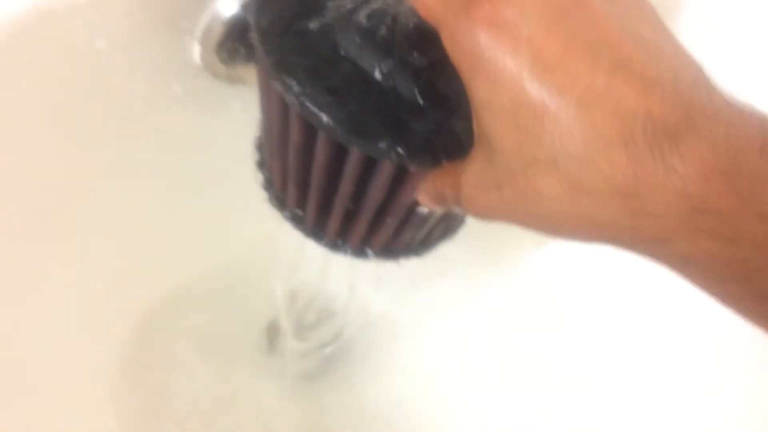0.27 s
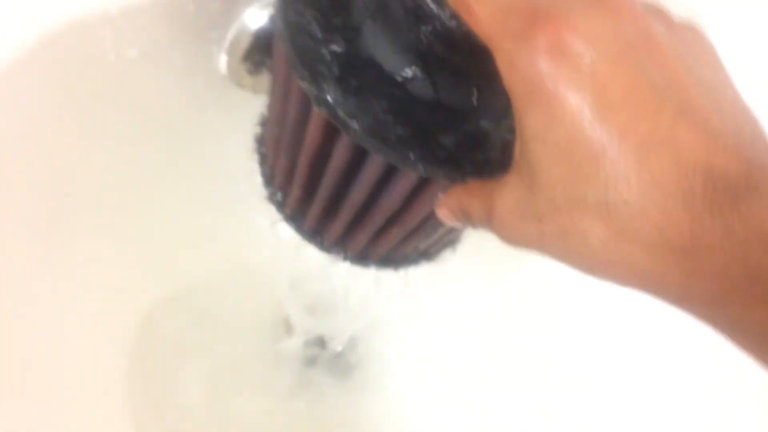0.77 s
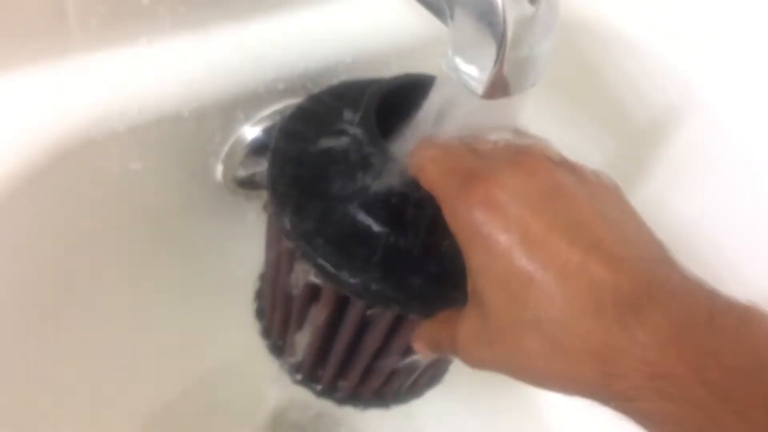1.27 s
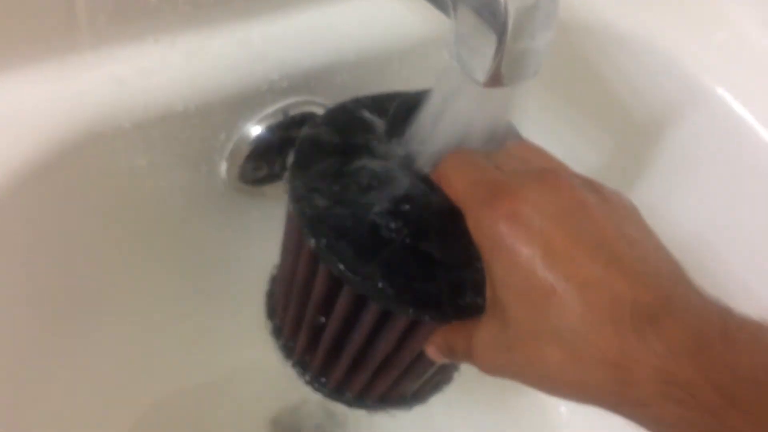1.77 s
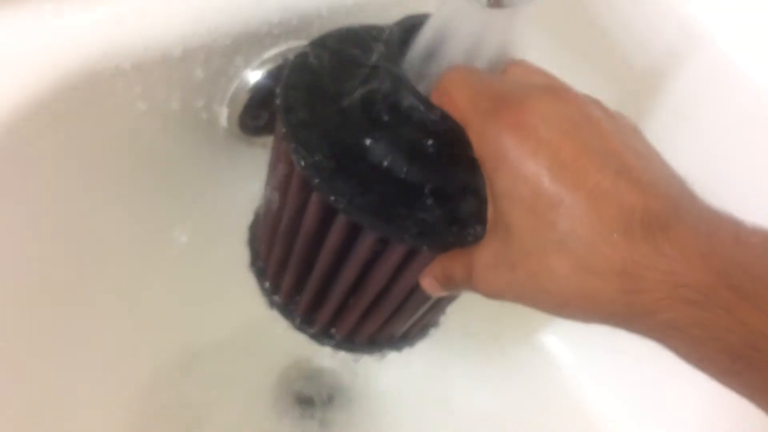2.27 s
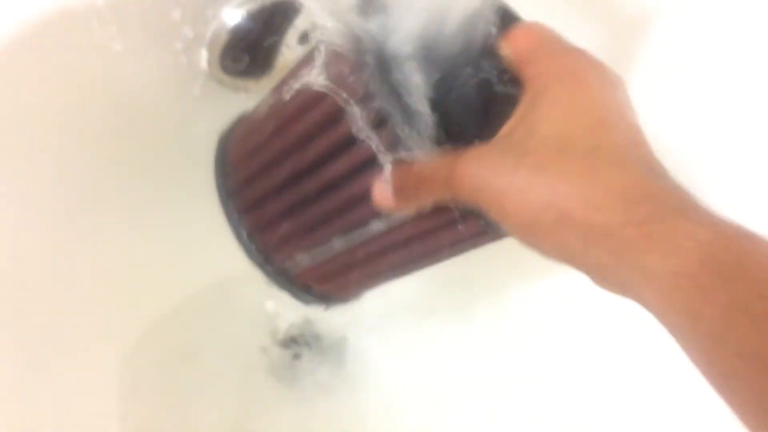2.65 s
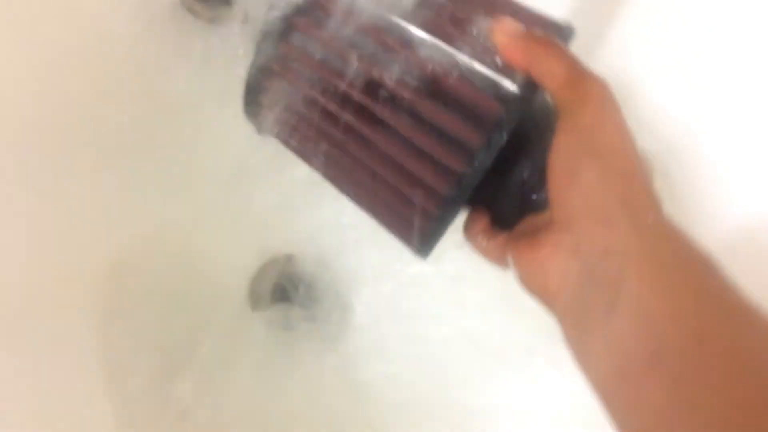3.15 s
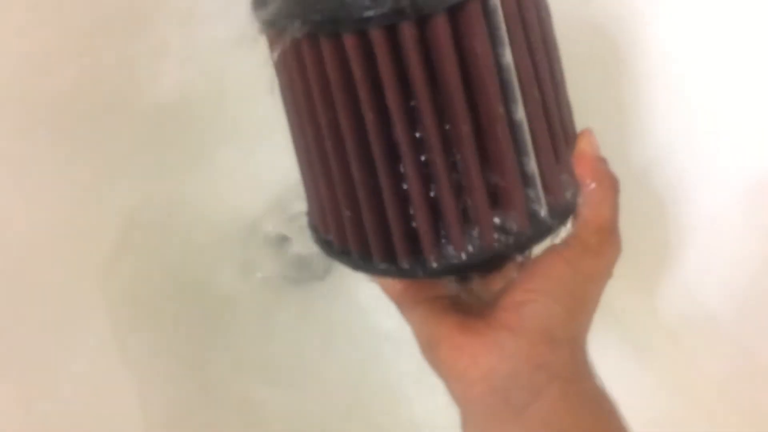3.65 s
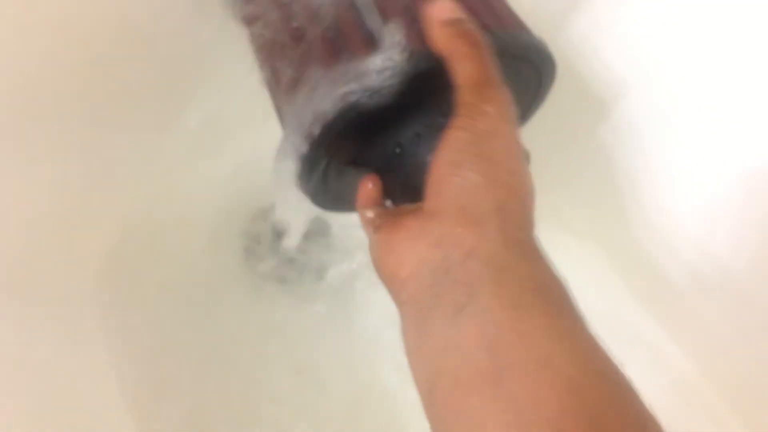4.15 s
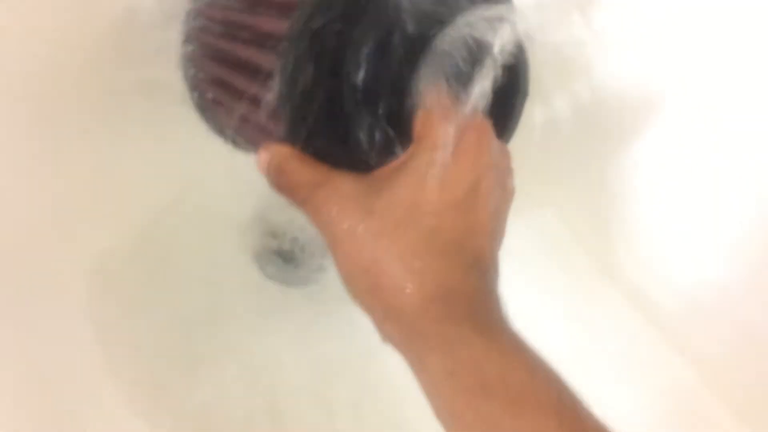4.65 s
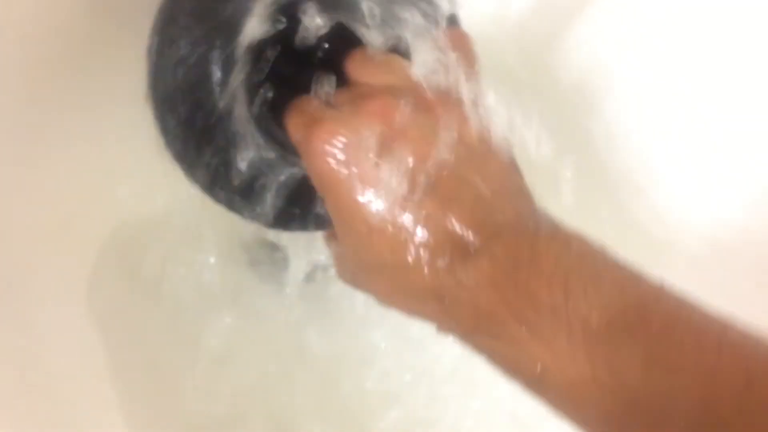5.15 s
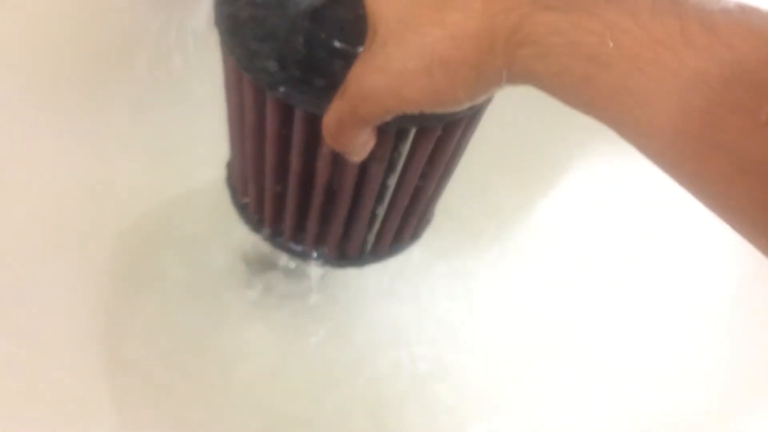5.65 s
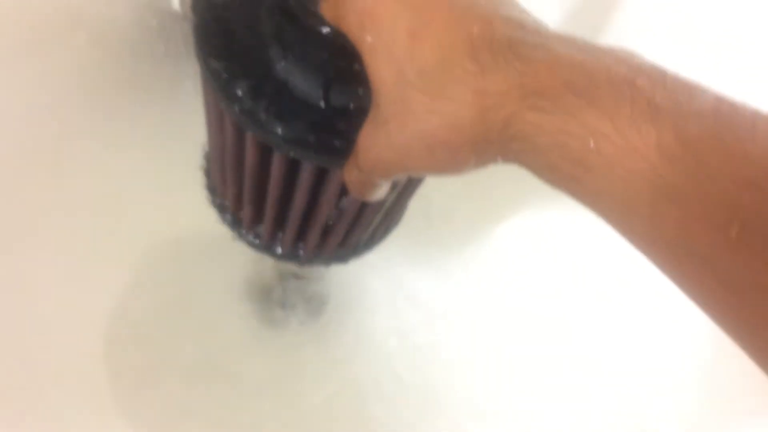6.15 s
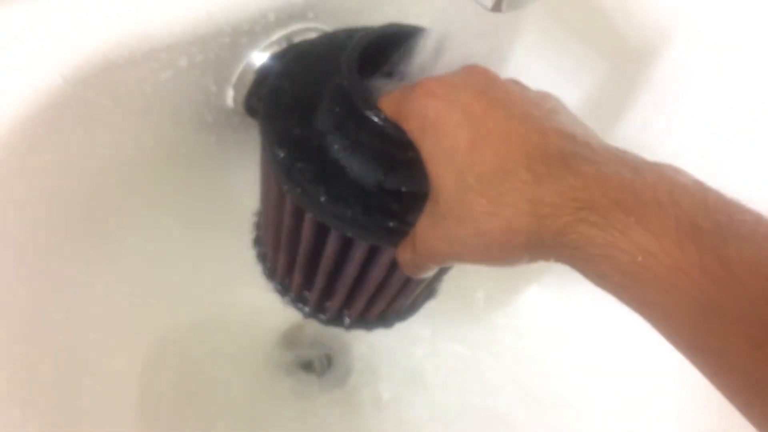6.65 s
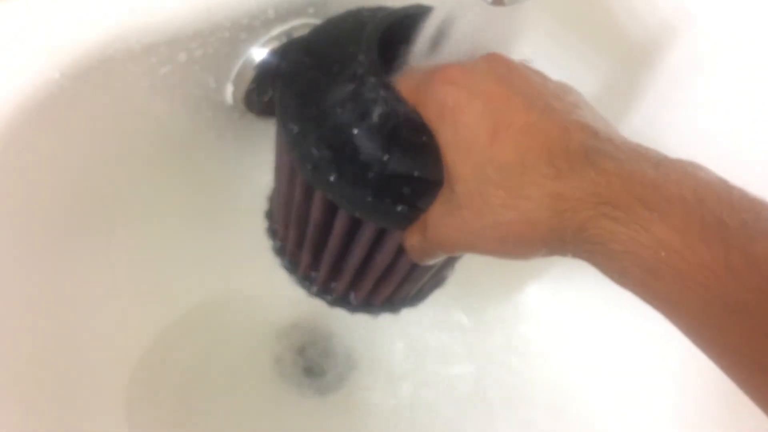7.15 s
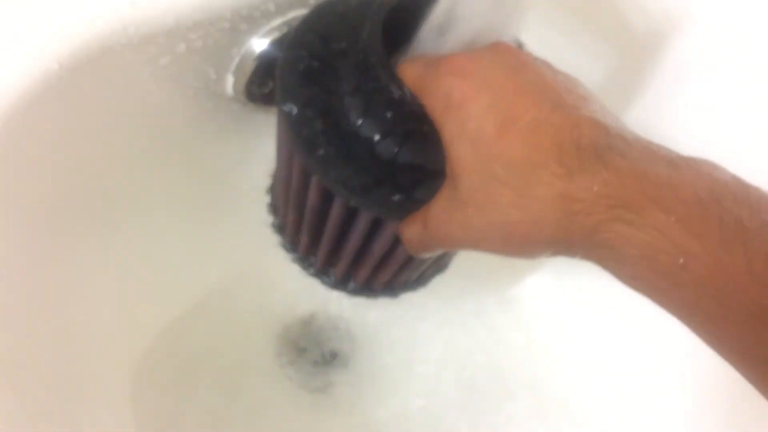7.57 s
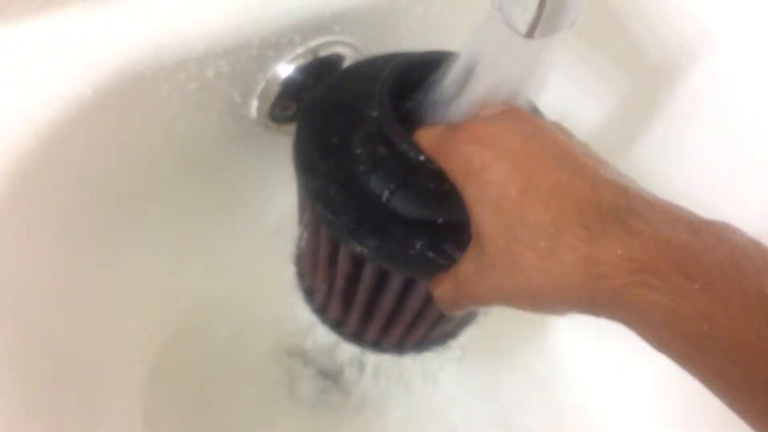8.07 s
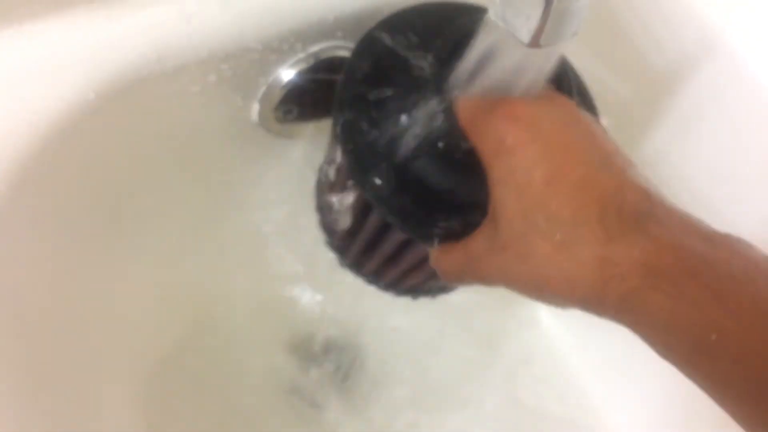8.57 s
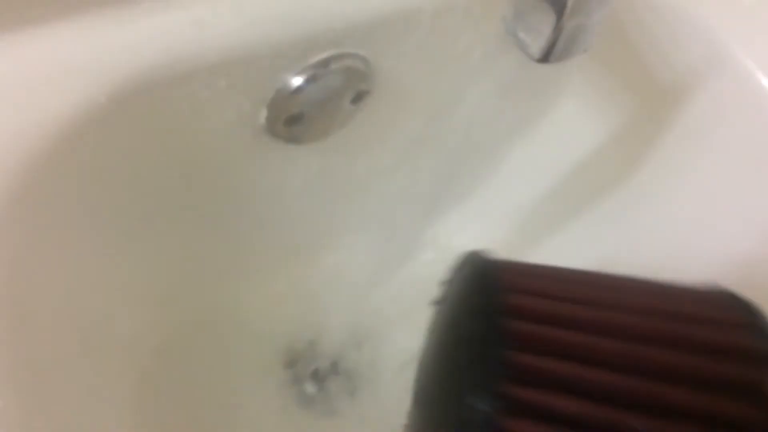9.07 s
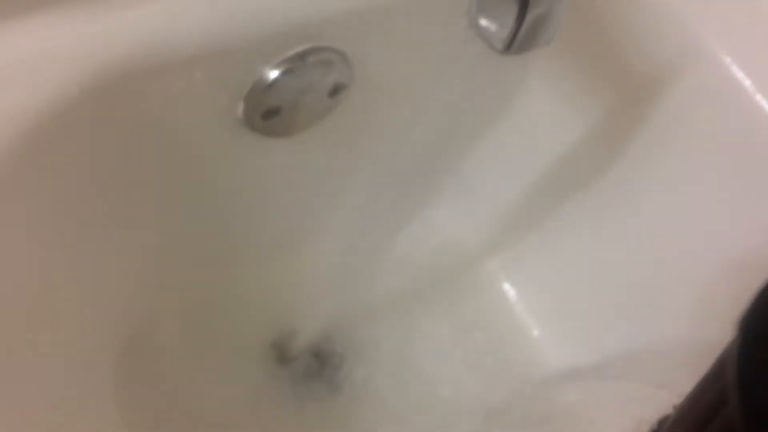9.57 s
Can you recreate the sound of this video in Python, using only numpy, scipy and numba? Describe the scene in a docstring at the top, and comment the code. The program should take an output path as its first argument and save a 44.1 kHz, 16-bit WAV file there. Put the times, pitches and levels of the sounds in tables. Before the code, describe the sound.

Steady hissing tap water sprays off a pleated filter and gurgles into a shallow tub, with a low hum beneath and a fuller splash at the close.

```python
"""In a bathroom a tap runs hard while a hand turns a pleated filter in the stream, close to the listener.
The spout's noise and resonances hiss and sing, clicks patter and spray, and decaying sines bubble in the tub.
Where the jet meets the pleats it tears into spray. Near the end the filter is pulled away and the whole
jet plunges into the tub. The splashing echoes between tub and ceiling; a mains hum lies underneath."""
import sys
import numpy as np
from scipy import signal
from scipy.fft import rfft, irfft
from scipy.io import wavfile
from numba import njit

SR = 44100
rng = np.random.default_rng(int(sys.argv[2]) if len(sys.argv) > 2 else 0)


def wav_record(signal):
    """Record a signal, one row per channel, as 16-bit PCM in the file named by sys.argv[1]."""
    frames = np.transpose(np.atleast_2d(signal))
    bounded = np.clip(frames, -1, 1)
    # unit amplitude maps onto the largest positive 16-bit level
    quanta = np.round(bounded * 32767).astype(np.int16)
    wavfile.write(sys.argv[1], SR, quanta)


N = 432180
TIME, FREQ = np.arange(N) / SR, np.arange(N // 2 + 1) * SR / N

# the filter is pulled out of the jet, which then falls freely into the tub
PULLED_S, PULL_TAKES_S = 9.065, 0.017


def undb(db):
    """Decibels to gain."""
    return 10 ** (np.asarray(db) / 20)


def unit(x):
    """Scale to a standard deviation of 1."""
    return x / np.std(x)


def noise():
    """White noise."""
    return rng.standard_normal(N)


def walk(rate):
    """Smooth random drift with a spread of 1, swinging about rate times a second."""
    size = 8192
    speed = FREQ[:size // 2 + 1] / rate
    spectrum = rfft(rng.standard_normal(size)) * speed / (1 + speed ** 3)
    slow = unit(irfft(spectrum))
    return np.interp(TIME, np.linspace(0, TIME[-1], size), slow)


def curve(table):
    """Join (time, value) points by straight lines."""
    return np.interp(TIME, *np.transpose(table))


def swing(table):
    """A level curve in dB, about its mean."""
    db = curve(table)
    return db - np.mean(db)


def ramp(start, length):
    """Rises from 0 to 1 over length seconds."""
    return np.clip((TIME - start) / length, 0, 1)


def spells(table, edge):
    """Sum of (start, length, dB) changes, each fading in from its start and out from its end."""
    return sum(db * (ramp(s, edge) - ramp(s + length, edge)) for s, length, db in table)


def colour(x, points):
    """Shape a spectrum through (Hz, dB) points joined over log frequency, then scale it to unit spread."""
    hz, db = np.transpose(points)
    gain = undb(np.interp(np.log(FREQ + 1), np.log(hz), db))
    return unit(irfft(rfft(x) * gain, N))


def resonance(hz, width):
    """Frequency response of one mode, 1 at its centre."""
    return 1j * FREQ * width / (hz ** 2 - FREQ ** 2 + 1j * FREQ * width)


def impacts(count, spread_db):
    """Random clicks of alternating sign, most of them small and a few large."""
    where, size = rng.random((count, 2)).T
    gain = undb(-spread_db * np.log(1 - .993 * size))
    sign = (-1) ** np.arange(count)
    return np.bincount((where * N).astype(int), gain * sign, N)


@njit
def ring(start, hz, gain, cycles, rise):
    """Sum of bubbles: each a sine that fades by 1 / e in its cycles while its pitch rises."""
    out = np.zeros(N)
    for k in range(len(start)):
        life = cycles[k] * SR / hz[k]  # samples
        first = int(start[k] * SR)
        for i in range(min(int(5 * life), N - first)):
            turn = hz[k] * i / SR
            swell = np.sin(min(turn / 1.5, 1.) * np.pi / 2)
            tone = np.sin(2 * np.pi * turn * (1 + rise * i / life / 2))
            out[first + i] += gain[k] * swell * np.exp(-i / life) * tone
    return out


def bubbles(count, low_hz, high_hz, cycles, spread_db, rise):
    """A cloud of bubbles of random size, strength and damping, scaled to unit spread."""
    when, pitch, size, damping = rng.random((count, 4)).T
    hz = low_hz * (high_hz / low_hz) ** pitch
    gain = undb(-spread_db * np.log(1 - .98 * size))
    return unit(ring(when * N / SR, hz, gain, cycles * (.5 + damping), rise))


def tap():
    """Turbulence in the valve hisses and rings the spout; hand and filter shade and bend the singing."""
    # spout resonances, each response applied twice: f/Hz, width of one response/Hz, relative level/dB,
    # shares of the low whistle, shading, high whistle and pitch bend [ratios], waver/dB
    spout = [(3255, 55, -45.5, .7, 0, 0, .1, 1), (3342, 90, -40.2, 1.2, 0, 0, .45, .5),
             (3790, 35, -50.5, 0, -.7, 0, 0, 1.5), (5386, 14, -50, 0, .2, 0, 0, 2),
             (5808, 115, -38.5, .1, 1.4, 0, .2, 1.2), (7095, 35, -46.5, 0, .8, 0, 0, 1.5),
             (7505, 120, -45, 0, .7, 0, .2, 1.5), (8015, 32, -42.5, 0, 0, .6, .05, 2),
             (8076, 36, -38, 0, .1, 1, .1, 1.2), (8110, 230, -40.5, .4, .3, .7, 1, 1),
             (8310, 40, -45, -.3, 0, .3, .05, 3.2), (8535, 80, -50.5, -.3, -.7, 0, .1, 2.2),
             (9938, 70, -43.8, 0, .9, .4, .1, 1.2), (10110, 50, -52, 0, .4, 0, 0, 2),
             (10437, 50, -53, 0, .4, 0, 0, 2)]
    # lowest whistle, used as a swing about its mean: t/s, level/dB
    whistle = [(0, -35), (0.3, -65), (0.52, -35), (0.85, -32), (1.03, -51), (1.18, -32), (1.95, -32),
               (2.25, -37.5), (3.3, -32.5), (3.6, -37.5), (4.4, -31), (4.62, -43), (4.8, -36), (5.8, -33.5),
               (6.35, -30), (8.3, -32.5), (9.8, -36.5)]
    # highest whistle, used as a swing about its mean: t/s, level/dB
    high_whistle = [(0, -42), (.13, -30), (.52, -41), (.85, -34.5), (2.1, -33.5), (3.7, -34), (4.4, -32.5),
                    (4.65, -34), (5.5, -34.5), (5.7, -38.5), (6.3, -35.5), (6.6, -36.5), (8, -33.5),
                    (8.9, -36), (9.8, -36.5)]
    # middle notes shaded as the filter is turned in front of the spout, before each share: t/s, level/dB
    shade = [(0, -2), (.3, 3), (.65, -2.5), (1, 2), (1.5, 0.5), (1.93, 1), (2.2, -3), (6.05, -6), (6.35, 2),
             (8.6, 0), (9.2, 0), (9.8, -3)]
    # whistles bend as the filter moves under the spout, before each share: t/s, pitch change [fraction]
    pitch_bend = [(0, -.008), (.7, .002), (1.2, .009), (1.9, .006), (2.5, -.012), (3.1, -.005),
                  (5.7, -.008), (6.5, .003), (7.5, .01), (8.1, -.003), (8.6, -.018), (9.2, -.005),
                  (9.8, -.002)]
    # spectrum of the valve's hiss: f/Hz, relative level/dB
    hiss_colour = [(300, -10), (900, -14), (2000, 3.5), (3600, 13.5), (5000, -10), (7000, 0), (9500, 9),
                   (12500, -15), (14000, 5), (15500, -21)]

    low_db, high_db = swing(whistle), swing(high_whistle)
    shade_db, bend = curve(shade), curve(pitch_bend)
    singing = 0
    for hz, width, db, low_share, shade_share, high_share, bend_share, waver_db in spout:
        mode = signal.hilbert(unit(irfft(rfft(noise()) * resonance(hz, width) ** 2, N)))
        # each resonance follows the bend and wavers by a small part of its width
        shift_hz = bend_share * bend * hz + 0.136 * width * walk(3.99)
        mode = np.real(mode * np.exp(2j * np.pi * np.cumsum(shift_hz) / SR))
        level_db = db + low_share * low_db + shade_share * shade_db + high_share * high_db
        singing = singing + mode * undb(level_db + waver_db * walk(2.3))
    hiss = colour(noise(), hiss_colour) * undb(-37.0)
    return (undb(0.33) * singing + hiss) * undb(.5 * walk(42))


def droplets(flow_db, free):
    """Drops patter on hand and enamel in uneven flurries; the pleats tear the jet into a fine bright spray."""
    # spectrum of the patter: f/Hz, relative level/dB
    patter_colour = [(200, -26), (450, -21.5), (750, -6.5), (1200, 2), (2600, -1.5), (4500, 0.5),
                     (7000, 4.5), (9500, -0.5), (15000, -12)]
    # spectrum of the spray: f/Hz, relative level/dB
    spray_colour = [(2000, -25), (5000, -8.5), (7500, -6), (9500, 0.5), (13000, 3), (13800, -3.5),
                    (15500, -2)]
    # the jet sweeps over pleats or rim and tears: start t/s, length/s,
    # extra level of the spray, and 1.4 times as much of the patter/dB
    sweeps = [(0.254, 0.061, 1), (2.72, 0.62, 0.5), (3.43, 0.32, 2), (3.76, 0.091, 0.5), (3.995, 0.21, 2),
              (4.317, 0.29, 1.5), (5.068, 0.42, 1)]

    patter = colour(impacts(count=70000, spread_db=3.2), patter_colour)
    spray = colour(impacts(count=55000, spread_db=4.1), spray_colour)
    sweep_db = spells(sweeps, edge=0.035)
    patter_db = -34 + 0.25 * flow_db + 1.4 * sweep_db + 2 * free + 1.26 * walk(26)
    spray_db = -35 + sweep_db + 3 * free + 0.28 * walk(25)
    return patter * undb(patter_db) + spray * undb(spray_db)


def pool(flow_db, free):
    """Run-off plunges into the shallow water in gouts; its bubbles ring in the hollow of the tub."""
    # hollow of the tub, which colours the bubbles: f/Hz, width/Hz, level over the direct sound/dB
    hollow_modes = [(600, 15, 3), (962, 44, -11), (1390, 140, -16)]
    # spectrum of the small bubbles, on top of their own: f/Hz, relative level/dB
    fizz_colour = [(700, 25.7), (1300, 1.5), (1900, 5.1), (2600, 5.4), (4000, 8.8), (6000, 9)]
    # run-off thickens to a rope and traps more large bubbles, or thins and traps fewer:
    # start t/s, length/s, extra level/dB
    spills = [(0.09, 0.2, 10), (0.718, .66, 4), (3.003, 0.62, -0.5), (5.264, 0.19, 5.5), (8.78, .3, -5)]

    large = bubbles(count=2100, low_hz=610, high_hz=1180, cycles=5.5, spread_db=3.2, rise=.06)
    gurgle = bubbles(count=4400, low_hz=1124, high_hz=1670, cycles=3.7, spread_db=3.5, rise=0.042)
    small = bubbles(count=12000, low_hz=1647, high_hz=4930, cycles=6.4, spread_db=4.0, rise=0.0435)
    small = colour(small, fizz_colour)

    # run-off comes in gouts of a limited size; the free jet plunges more evenly
    uneven = 1 - free / 2
    gouts = np.tanh(walk(2.6))
    large_db = -50.5 + flow_db + spells(spills, edge=0.024) + 3 * free
    large_db = large_db + uneven * (1.5 * gouts + 3.6 * np.tanh(walk(5.4)))
    gurgle_db = -43.5 + 1.6 * flow_db + uneven * (1.4 * gouts + 1.1 * np.tanh(walk(19)))
    small_db = -38.5 + 0.53 * flow_db + uneven * (2.3 * gouts + 1.47 * walk(24))
    cloud = large * undb(large_db) + gurgle * undb(gurgle_db) + small * undb(small_db)

    hollow = 1 + sum(undb(db) * resonance(hz, width) for hz, width, db in hollow_modes)
    return irfft(rfft(cloud) * hollow, N)


def gurgles():
    """Each gout releases a quick run of overlapping bubbles around one pitch."""
    # gouts that trap bubbles of like size: start t/s, length/s, centre f/Hz, rms level over the length/dB
    gouts = [(0.599, .08, 1390, -40), (1.0, 0.15, 1900, -37.5), (2.242, .09, 1210, -40),
             (6.039, .09, 1570, -40.5), (9.098, .14, 1440, -37), (9.48, .07, 846, -40)]
    bubbles_per_s, pitch_spread, ring_cycles = 260, .17, 4.5  # spread as a fraction either way

    out = np.zeros(N)
    for s, length, hz, db in gouts:
        count = max(int(bubbles_per_s * length), 3)
        when, pitch, size = rng.random((count, 3)).T
        start = s + length * (np.arange(count) + when) / count
        pitch_hz = hz * (1 + pitch_spread * (2 * pitch - 1))
        run = ring(start, pitch_hz, .5 + size, np.full(count, ring_cycles), rise=0.022)
        out += run * undb(db) * np.sqrt(length * SR / np.sum(run ** 2))
    return out


def churn(free):
    """The unbroken jet beats the surface with a dense rush of small impacts."""
    # spectrum of the churning pool: f/Hz, relative level/dB
    churn_colour = [(250, -30), (400, -19), (550, -3), (850, -5), (1100, -10), (1450, -1), (2500, -1),
                    (4000, -5), (6000, 0.5), (10000, -29)]
    rush = colour(impacts(count=26000, spread_db=4), churn_colour)
    return rush * free * undb(-34.5 + 1.3 * walk(30))


def plops():
    """Single loud bubbles, large and small, ring out above the cloud as fading sines of rising pitch."""
    # single bubbles: t/s, starting f/Hz, relative level/dB, cycles to fade by 1 / e
    single_bubbles = [(.164, 583, -21, 4.8), (.174, 620, -25, 5.6), (.183, 860, -29, 4.6),
                      (.215, 1370, -22, 7.6), (.322, 2900, -19, 7), (0.414, 1280, -18, 3.9),
                      (.653, 1840, -21, 5), (.676, 2680, -22, 7.1), (.766, 2740, -18, 7),
                      (.798, 1510, -25, 7), (1.364, 1440, -19, 5), (1.506, 1740, -20, 5),
                      (1.605, 1504, -18.5, 6.5), (1.685, 2200, -23, 7.4), (1.827, 1380, -22, 5),
                      (1.924, 1160, -17, 3.9), (2.043, 3900, -18, 8), (2.248, 2200, -29, 10),
                      (2.416, 2070, -21, 11), (2.432, 1310, -13, 3.2), (2.524, 3120, -16, 11),
                      (2.616, 2100, -19, 10), (2.653, 2170, -20, 9), (2.69, 1000, -26, 6.3),
                      (2.748, 1420, -15, 5.5), (2.79, 760, -28, 4.7), (2.793, 1430, -31, 6.4),
                      (2.897, 1430, -18.5, 5.7), (3.257, 3230, -15.5, 11), (3.600, 1400, -19, 6.3),
                      (3.917, 1180, -24, 7.4), (4.018, 1840, -19.5, 6), (4.087, 2100, -19, 6),
                      (4.293, 750, -31, 6.2), (4.382, 2040, -19.5, 5.6), (4.908, 575, -29, 5.8),
                      (5.392, 650, -23.5, 6.6), (5.404, 730, -31, 5.4), (5.414, 970, -26, 5.5),
                      (6.081, 1810, -19.5, 7), (6.123, 1400, -23, 8.8), (6.308, 770, -29, 4),
                      (6.5, 1270, -20, 5.8), (6.673, 960, -28, 7.8), (6.747, 1500, -20, 7),
                      (6.783, 1560, -22, 5), (6.851, 1400, -22, 5), (6.885, 760, -29, 6),
                      (6.961, 1740, -20, 5), (7.177, 2300, -20, 7), (7.195, 1510, -19, 5.7),
                      (7.217, 1400, -25, 5), (7.308, 2180, -18, 5.2), (7.483, 1540, -22, 7),
                      (7.958, 1330, -23, 8.9), (8.2, 1265, -24, 7), (8.754, 763, -25.5, 4.1),
                      (8.968, 1190, -21, 4.6), (8.97, 1800, -21, 5.4), (9.024, 1360, -15.5, 6),
                      (9.137, 2030, -21, 8), (9.162, 700, -23, 3.7), (9.213, 626, -23.5, 5),
                      (9.222, 1440, -19, 7.7), (9.303, 886, -20, 4.8), (9.334, 1700, -17, 6),
                      (9.371, 1350, -18, 5), (9.519, 1910, -21, 6), (9.558, 1420, -21, 6),
                      (9.589, 1600, -19, 4.3)]
    s, hz, db, cycles = np.array(single_bubbles, float).T.copy()
    return ring(s, hz, undb(db), cycles, rise=0.027) * undb(-0.1)


def smacks(cycles):
    """Each hard drop is a crack of band-passed noise, its excitation fading by 1 / e in its cycles."""
    # hard drops that smack nearby: t/s, peak level before the echoes/dB, f/Hz
    hard_drops = [(.301, -14, 10000), (.798, -13.5, 6500), (2.946, -14, 7400), (4.093, -12, 11000),
                  (4.178, -11, 12000), (4.404, -15, 7600), (4.745, -12, 4400), (5.082, -14, 8300),
                  (6.168, -13, 7500), (7.749, -15, 5300), (9.084, -12, 8000), (9.179, -12, 7800),
                  (9.259, -11, 8500), (9.337, -12, 5000), (9.497, -11.5, 6700), (9.744, -7, 7500)]
    out, age = np.zeros(N), TIME[:512]
    for s, db, hz in hard_drops:
        band = signal.butter(1, [.6 * hz, min(1.5 * hz, 18000)], "band", fs=SR)
        burst = rng.standard_normal(len(age)) * np.exp(-age * hz / cycles)
        crack = signal.lfilter(*band, burst)
        out[int(s * SR):][:len(age)] += undb(db) * crack / np.max(np.abs(crack))
    return out


def drum(modes):
    """Falling water rings a set of low modes; scaled to unit spread."""
    response = sum(undb(db) * resonance(hz, width) ** 2 / np.sqrt(width) for hz, width, db in modes)
    return unit(irfft(rfft(impacts(count=3000, spread_db=1)) * response, N))


def tub(flow_db):
    """Water booms in the air between tub and ceiling, harder once the filter no longer breaks the jet."""
    # booming air in the tub, each response applied twice: f/Hz, width of one response/Hz, relative level/dB
    boom_modes = [(144.7, 30, -2), (170, 16, 0)]
    # low modes of the air between tub and ceiling, above the boom, each response applied twice:
    # f/Hz, width of one response/Hz, relative level/dB
    upper_modes = [(247.8, 14, -2.5), (267.3, 26, -5), (331.8, 8.3, -7.5), (358.4, 23, -9), (423, 32, -7),
                   (470, 25, -10.5), (515.6, 16, -8.5)]
    # gouts thud on the tub floor: centre t/s, extra boom level/dB, extra upper-mode level/dB
    thuds = [(.33, 8, 5), (.8, 9, 8), (1.66, 9.5, 8), (2.1, 4, 8), (2.65, 7, 2.5), (3, 8, -3),
             (3.9, 13.5, 3), (4.27, 2, 7.5), (5.18, 6, 1), (5.42, 9, 2.5), (5.8, 4, 5.5), (8.2, 3, 3),
             (9.22, 9.5, -3), (9.47, 4, 9), (9.72, 7, -3)]
    build_s, thud_s = 0.45, 0.1

    build = ramp(PULLED_S, build_s)
    boom_db, upper_db = -57 + 6.5 * build, -56 + build
    for s, extra_boom_db, extra_upper_db in thuds:
        thud = np.exp(-((TIME - s) / thud_s) ** 2)
        boom_db = boom_db + extra_boom_db * thud
        upper_db = upper_db + extra_upper_db * thud
    drumming = drum(boom_modes) * undb(boom_db) + drum(upper_modes) * undb(upper_db)
    return drumming * undb(0.38 * flow_db)


def bathroom(x):
    """Hard walls close by add a short dense tail; random drift blends three tails for spots where water lands."""
    fade_t60_s, room_db = 0.2, -4
    age = TIME[:SR // 2]
    fade = np.exp(-np.log(1000) * age / fade_t60_s) * (age > .002)
    spots = np.array([walk(12) for _ in range(3)])
    wet = 0
    for share in spots / np.linalg.norm(spots, axis=0):
        # keep only the phase of a fading noise, so that its spectrum is flat, then fade it again
        phase = np.angle(rfft(rng.standard_normal(len(age)) * fade))
        tail = irfft(np.exp(1j * phase)) * np.sqrt(fade)
        wet = wet + signal.fftconvolve(x * share, tail / np.linalg.norm(tail))[:N]
    return undb(room_db) * wet


def flutter(x):
    """Sound bounces between tub and ceiling, duller on each trip, and gives the splashing a hollow ring."""
    ceiling_m, low_gain, dull_hz = 2.01, .42, 1300
    gain = low_gain / np.sqrt(1 + (FREQ / dull_hz) ** 4)
    trip = np.exp(-2j * np.pi * FREQ * 2 * ceiling_m / 343)  # there and back at 343 m/s
    return irfft(rfft(x) * np.sqrt(1 - gain ** 2) / (1 - gain * trip), N)


def hum():
    """A motor hums at twice the mains frequency over a faint rumble of air."""
    # spectrum of the rumble: f/Hz, relative level/dB
    rumble_colour = [(20, -21), (45, -4.5), (80, 4), (200, -7), (500, -8), (1200, -40), (4000, -45)]
    hum_hz, hum_db = 120, -46
    tone = unit(np.sin(2 * np.pi * hum_hz * TIME)) * undb(hum_db + 1.1 * walk(11))
    return tone + colour(noise(), rumble_colour) * undb(-52.5)


def scene():
    """Tap, splashing, tub and hum, the same in both channels."""
    # run-off from the filter into the pool, used as a swing about its mean: t/s, level/dB
    runoff = [(0, -36), (1.05, -35.5), (2.1, -36.5), (2.75, -34.5), (3.3, -39), (3.6, -35.5), (4.3, -41.5),
              (5, -40), (5.45, -37), (5.8, -39), (6.05, -36.5), (6.3, -38), (7.2, -35.5), (8.7, -36),
              (9.2, -33.5), (9.8, -37)]
    flow_db = swing(runoff)
    free = ramp(PULLED_S, PULL_TAKES_S)  # 0 with the filter in the jet, 1 with the jet free
    water = droplets(flow_db, free) + pool(flow_db, free) + gurgles() + churn(free)
    close = plops() + smacks(cycles=15)
    # the close sounds feed the room less than the rest of the water does
    room = bathroom(water + .55 * close)
    splashing = flutter(water + close + room)
    mono = tap() + splashing + tub(flow_db) + hum()
    return np.array([mono, mono])


def record(dry):
    """The recorder cuts the top steeply with an elliptic low-pass."""
    top_hz = 15250
    low_pass = signal.ellip(12, .1, 90, top_hz, fs=SR, output="sos")  # ripple .1 dB, stop band -90 dB
    return signal.sosfilt(low_pass, dry)


dry = scene()
out = record(dry)
wav_record(out)
```